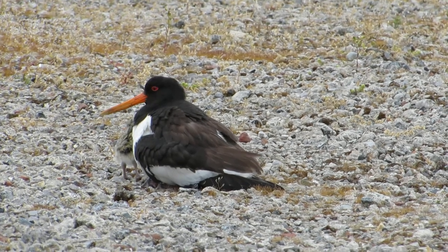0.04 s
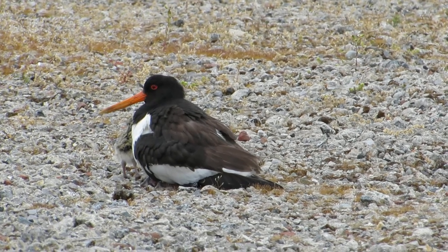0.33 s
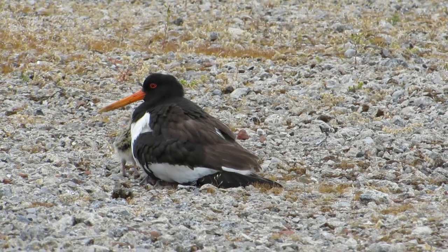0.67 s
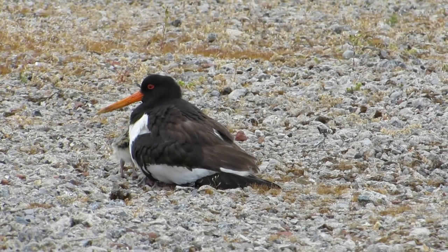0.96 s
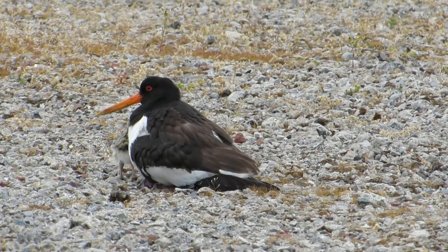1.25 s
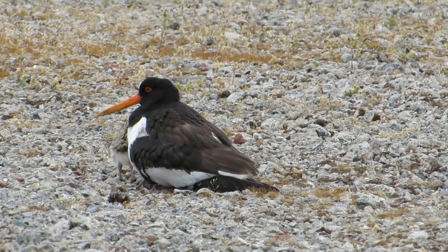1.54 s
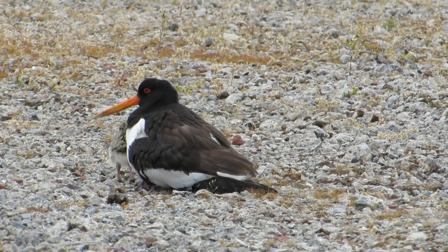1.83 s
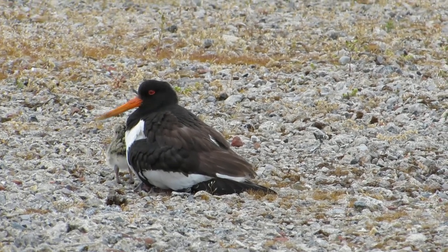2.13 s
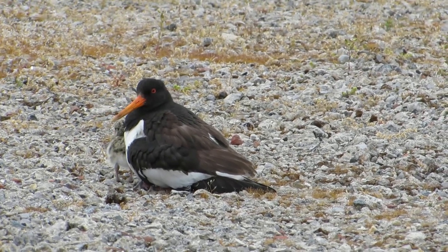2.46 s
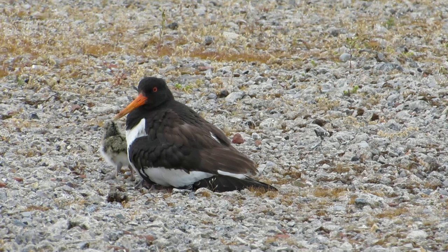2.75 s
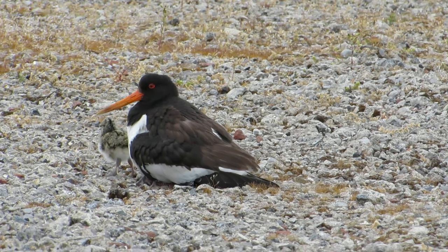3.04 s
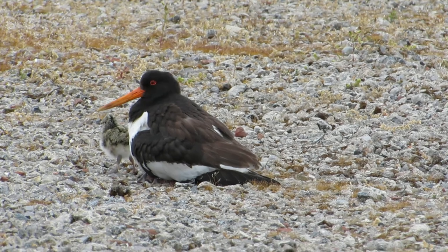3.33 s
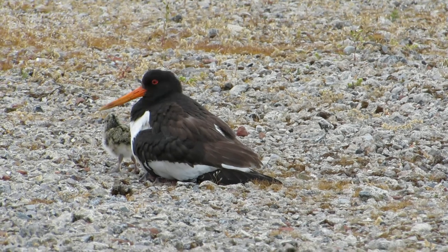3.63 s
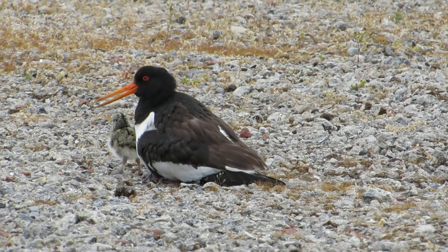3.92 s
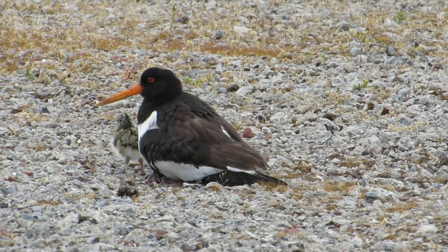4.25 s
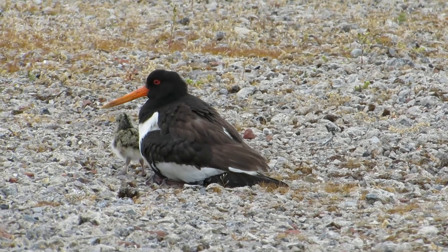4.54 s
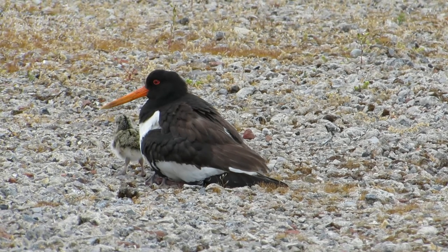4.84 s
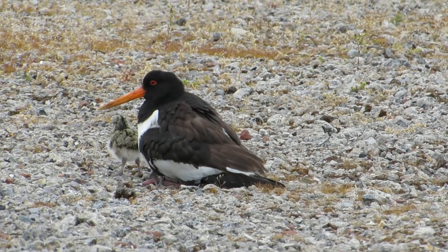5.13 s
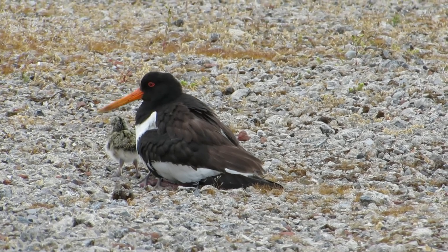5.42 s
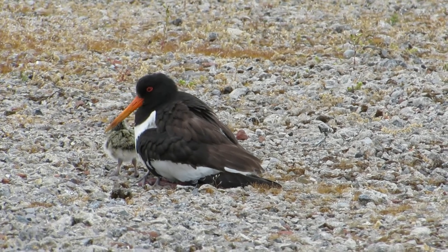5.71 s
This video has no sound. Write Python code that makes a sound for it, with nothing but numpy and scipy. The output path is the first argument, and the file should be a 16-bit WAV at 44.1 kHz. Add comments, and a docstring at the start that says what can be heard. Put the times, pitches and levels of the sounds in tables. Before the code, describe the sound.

Low gusts thump and rumble on the microphone outdoors on a stony shore, over a far roar like surf or traffic and a faint hiss. Light ticks and soft rubbing come close by between the early puffs. After one sharp, crackling gust, a shorebird pipes once, a brief whistle that jumps up and slides down. The buffeting dies away and the background grows slightly louder.

```python
"""Wind buffets the camera's microphone ports in puffs, over a distant roar and a faint hiss.
The hardest puffs crackle and push the gain control down. Small dry contacts tick and rustle close by.
Near 4 s an oystercatcher on a shingle bank gives one piping call that rises and sinks:
a few partials from the syrinx, shaped by throat and bill, echoed faintly by the shore."""
import sys
import numpy as np
from scipy import signal
from scipy.fft import rfft, irfft, next_fast_len
from scipy.io import wavfile
from scipy.ndimage import uniform_filter1d, minimum_filter1d, map_coordinates

SR = 44100
rng = np.random.default_rng(int(sys.argv[2]) if len(sys.argv) > 2 else 0)


def unload_wav(signal):
    """Save mono or channel-first audio to the path in sys.argv[1] as 16-bit WAV at rate SR, clipped to [-1, 1]."""
    wavfile.write(
        sys.argv[1],
        SR,
        np.round(np.clip(np.atleast_2d(signal).T, -1, 1) * 32767).astype(np.int16),
    )


N = 259308

# Slow rise and fall of the whole background, roar and hiss together: time_s, level_db
BACKGROUND_LEVEL = [(0, -51.5), (.7, -47), (1.15, -45.5), (2.3, -49), (3.15, -47), (4.7, -46),
                    (5.15, -44.5), (5.35, -42.5), (5.5, -43), (5.88, -40)]


def amp(db):
    """Decibels to gain."""
    return 10 ** (np.asarray(db) / 20)


def unit(x):
    """x at rms 1."""
    return x / np.sqrt(np.mean(x ** 2) + 1e-20)


def along(points, hz):
    """Interpolate (freq_hz, value) points on a log axis."""
    freq_hz, values = np.transpose(points)
    return np.interp(np.log(hz + 1), np.log(freq_hz + 1), values)


def curve(points):
    """Interpolate (time_s, value) points at every sample."""
    time_s, values = np.transpose(points)
    return np.interp(np.arange(N) / SR, time_s, values)


def wobble(rate_hz):
    """Smooth random curve, rate_hz knots a second."""
    knots = rng.standard_normal(int(N * rate_hz / SR) + 4)
    return map_coordinates(knots, [np.arange(N) * rate_hz / SR])


def filtered(x, response):
    """Apply the frequency response response(hz)."""
    n = x.shape[-1]
    padded = next_fast_len(n + 4096)
    return irfft(rfft(x, padded) * response(np.fft.rfftfreq(padded, 1 / SR)), padded)[..., :n]


def add(track, start_s, sound):
    """Mix a short sound into the track."""
    start = max(round(start_s * SR), 0)
    track[start:start + len(sound)] += sound[:N - start]


def wind(wake_db=-20, wake_s=0.046, ref_length_s=0.0073, lumps_db=6.0, lean_db=24.5,
         cross_db=-3.0, cross_hz=1700):
    """Turbulence on two close ports; each port's bass also reaches the other channel, inverted."""
    # Breeze on the ports: time_s, level_db
    breeze = [(0, -27.5), (.3, -44), (.75, -23), (1.05, -32), (1.3, -21), (2, -19), (2.3, -31.5),
              (2.75, -20.5), (3.72, -49), (3.92, -20), (4.55, -26), (4.85, -51), (5.5, -65), (5.85, -40.5)]
    # Buffeting spectrum: freq_hz, density_db
    buffet = [(20, 1), (45, 0), (90, 0), (150, -8.5), (250, -21), (500, -35), (1500, -109)]
    # Strong puffs: time_s, level_db, half_length_s, cutoff_hz, side (+ left, - right)
    puffs = [(0.096, -5, 0.01, 210, 0.089), (0.158, -15.5, 0.0048, 256, 1),
             (0.635, -3.5, 0.0085, 258, -.35), (1.178, -2.5, 0.011, 186, 0.43),
             (1.198, 1.5, 0.0063, 237, 0.54), (1.215, 0, 0.0093, 140, 0.47),
             (1.238, -2.5, 0.0034, 440, 0.83), (1.27, -10, .008, 130, 0.9), (1.322, 0, .006, 149, 0.46),
             (1.34, -2.5, 0.0096, 215, 1), (1.474, 0, 0.0068, 268, .02), (1.507, 1, 0.0054, 247, 1),
             (1.524, 7.5, .0052, 297, 0.68), (1.555, 3.5, 0.0088, 262, 0.73), (1.569, 1, 0.0083, 260, 0.4),
             (1.714, -6.5, 0.016, 220, -0.78), (1.813, -4.5, 0.021, 190, 0.16),
             (1.962, -14.5, 0.025, 125, -1.4), (2.139, 0.5, 0.0053, 170, 0.64),
             (2.146, -2.5, 0.0035, 305, 0.96), (2.844, -8.5, 0.0097, 223, -0.82),
             (3.31, -6, .004, 205, 0.63), (3.321, -0.5, 0.0027, 297, 0.49), (3.331, 1, 0.0064, 260, 0.96),
             (3.368, -11, .008, 228, .5), (3.395, -1.5, .007, 220, 0.88), (3.412, -5.5, 0.0083, 190, .5),
             (3.428, 8.5, 0.0019, 500, .68), (3.433, 6, 0.0041, 190, -0.025),
             (3.464, -4, .0031, 330, -0.99), (3.521, -6.5, .0042, 310, -1.2),
             (3.952, -10.5, 0.015, 150, -1.06)]
    t = np.arange(N) / SR
    # Buffeting surrounds each puff, more for long ones.
    wakes = sum(amp(db + wake_db) * np.sqrt(length_s / ref_length_s) * np.exp(-np.abs(t - s) / wake_s)
                for s, db, length_s, _, _ in puffs)
    breeze_db = 20 * np.log10(amp(curve(breeze)) + wakes)
    side = curve([(s, port) for s, _, _, _, port in puffs])  # the breeze leans with the puffs
    flow = filtered(rng.standard_normal((2, N)), lambda hz: amp(along(buffet, hz)))
    lumps = amp(lumps_db * np.array([wobble(23.77), wobble(17)]) + lean_db * np.array([side, -side]) / 2)
    buffeting = amp(breeze_db) * unit(flow * lumps) / np.sqrt(2)
    ports = buffeting + eddies(puffs) + stray_eddies(breeze_db, side)
    return ports - amp(cross_db) * filtered(ports[::-1], lambda hz: 1 / (1 + 1j * hz / cross_hz))


def eddies(rows, highpass_hz=45, steepness=4.08):
    """Each eddy is one compact, randomly shaped lump of pressure on one port."""
    ports = np.zeros((2, N))
    t = np.arange(-SR // 16, SR // 16) / SR
    for time_s, level_db, half_length_s, cutoff_hz, side in rows:
        swirl = rfft(rng.standard_normal(len(t)) * np.exp(-(t / half_length_s) ** 2))
        lump = irfft(swirl / np.abs(swirl), len(t)) * np.exp(-(t / (2 * half_length_s)) ** 2)
        eddy = filtered(lump, lambda f: f / (highpass_hz + 1j * f) / (1 + (f / cutoff_hz) ** steepness))
        add(ports[int(side < 0)], time_s + t[0], amp(level_db) * eddy / np.abs(eddy).max())
    return ports


def stray_eddies(breeze_db, side, count=40, offset_db=-1, scatter_db=2.5,
                 half_length_s=0.017, cutoff_hz=159):
    """Small eddies at random moments, about as strong as the breeze that carries them."""
    moments = rng.integers(N, size=count)
    peaks_db = breeze_db[moments] + offset_db + scatter_db * rng.standard_normal(count)
    return eddies([(i / SR, db, half_length_s, cutoff_hz, side[i]) for i, db in zip(moments, peaks_db)])


def diffuse_noise(spectrum):
    """Noise from all around at rms 1: channels alike in the bass, unrelated in the treble."""
    # Left-right likeness: freq_hz, correlation
    likeness = [(60, 0.88), (130, 1), (290, 0.56), (630, 0.81), (1380, 0.68), (3010, 0.39), (6590, 0.007),
                (14400, 0.037)]

    def mid_side(hz):
        angle = np.arccos(np.clip(along(likeness, hz), -1, 1)) / 2
        return amp(along(spectrum, hz)) * [np.cos(angle), np.sin(angle)]

    mid, side = filtered(rng.standard_normal((2, N)), mid_side)
    return unit(np.array([mid + side, mid - side]))


def distant_roar(rumble_db=-41, rumble_follow=0.67, rumble_waver_db=1.0, rush_waver_db=0.3, lean_db=0.32):
    """Far traffic or surf: a low rumble under a broad rush, both following the background level."""
    # Rumble spectrum: freq_hz, density_db
    rumble_spectrum = [(13, -76), (22, -5.5), (36, -0.5), (59, 0), (128, -5), (161, -6), (204, -11),
                       (380, -17.5), (490, -24.5), (840, -120)]
    # Rush spectrum: freq_hz, density_db
    rush_spectrum = [(280, -11), (480, -6), (523, -1), (707, 0.5), (929, -6.5), (1350, -10.5),
                     (1600, -14.5), (1830, -14), (2690, -23), (3590, -26.5), (3960, -31.5), (7460, -32.5),
                     (8130, -36), (12700, -40), (14900, -54)]
    rush_db = curve(BACKGROUND_LEVEL)
    drift_db = rumble_follow * (rush_db - rush_db.mean())
    rumble = amp(rumble_db + drift_db + rumble_waver_db * wobble(6.2)) * diffuse_noise(rumble_spectrum)
    rush = amp(rush_db + rush_waver_db * wobble(7.0)) * diffuse_noise(rush_spectrum)
    return rumble + rush * amp([[lean_db], [-lean_db]])


def thin_hiss(centre_hz=7580, width_hz=90, mean_db=-83):
    """Faint narrow band of hiss that rises and falls with the whole background."""
    background_db = curve(BACKGROUND_LEVEL)
    band = filtered(rng.standard_normal(N), lambda hz: np.exp(-((hz - centre_hz) / width_hz) ** 2))
    return amp(mean_db + background_db - background_db.mean()) * unit(band)


def tick_colour(hz, gap_hz=4000, gap_width_hz=480):
    """Ticks and rustles ring near 2.8 and 5.6 kHz, with little between."""
    # Short resonances: centre_hz, width_hz, gain_db
    modes = [(1820, 260, 0), (2790, 610, 4), (5600, 1460, -0.5), (10000, 5500, -22)]
    response = sum(amp(db) * (1j * hz * width / (centre ** 2 - hz ** 2 + 1j * hz * width)) ** 2
                   for centre, width, db in modes)
    return response * (1 - np.exp(-((hz - gap_hz) / gap_width_hz) ** 2))


def ticks():
    """Small hard contacts: noise bursts in a few short resonances, each in its own band."""
    # Contacts: start_s, peak_db, centre_hz, spread_octaves, t60_s
    contacts = [(.493, -44.5, 2870, 0.17, .021), (.533, -56.5, 6200, .42, 0.029),
                (.599, -39.5, 2600, 0.97, .028), (0.625, -47, 4440, 1.1, .056),
                (1.078, -46, 2200, 0.55, .021), (1.2729, -27, 3870, 1.2, 0.011),
                (1.282, -40, 3100, 0.86, 0.025), (1.343, -53, 8060, 1, 0.005),
                (1.351, -50.5, 3200, 0.27, .04), (1.359, -55, 7000, .9, .01)]
    track = np.zeros(N)
    t = np.arange(SR // 8) / SR
    for start_s, peak_db, centre_hz, spread_octaves, t60_s in contacts:
        burst = rng.standard_normal(len(t)) * amp(-60 * t / t60_s)
        band = lambda hz: np.exp(-(np.log2((hz + 1) / centre_hz) / spread_octaves) ** 2)
        tick = filtered(burst, lambda hz: tick_colour(hz) * band(hz))
        add(track, start_s, amp(peak_db) * tick / np.abs(tick).max())
    return track


def overload_cracks(half_length_s=0.00063, cutoff_hz=2800, antiphase=0.35):
    """The microphone snaps at the crest of the hardest puffs, partly in antiphase between channels."""
    # Snaps: time_s, peak_db
    snaps = [(1.198, -34.5), (1.52, -30), (1.5224, -29.5), (3.427, -24)]
    track = np.zeros((2, N))
    t = np.arange(-SR // 200, SR // 200) / SR
    for time_s, peak_db in snaps:
        noise = rng.standard_normal((2, len(t)))
        burst = (noise - antiphase * noise[::-1]) * np.exp(-(t / half_length_s) ** 2)
        snap = filtered(burst, lambda hz: 1 / (1 + 1j * hz / cutoff_hz))
        for channel, sound in zip(track, snap):
            add(channel, time_s + t[0], amp(peak_db) * sound / np.abs(sound).max())
    return track


def rustles(grain_db=3, highpass_hz=2100):
    """Light rubbing close by: grainy noise in the same resonances as the ticks."""
    # Strokes: centre_s, level_db, half_length_s
    strokes = [(1.96, -66, 0.11), (2.145, -73, 0.023), (2.726, -74, .11), (3.1, -71, 0.29),
               (4.32, -64, .02)]
    t = np.arange(N) / SR
    envelope = sum(amp(db) * np.exp(-((t - s) / half_length_s) ** 2) for s, db, half_length_s in strokes)
    friction = rng.standard_normal((2, N)) * amp(grain_db * wobble(70))
    rubbing = filtered(friction, lambda hz: tick_colour(hz) / (1 + (highpass_hz / (hz + 1)) ** 8))
    return envelope * unit(rubbing)


def oystercatcher(attack_s=0.0036, release_s=0.038, fade_db=15, settle_s=0.0078, gain_db=0.2, rasp_db=-57,
                  jitter=0.008, shimmer_db=0.5, flutter_db=0.5, mellowing=0.43, rolloff_partial=5.33):
    """A whistle with a rasping start; partials flare as they slide through throat and bill resonances."""
    # Quick rise, long sag: time_s, pitch_hz
    contour = [(3.952, 2230), (3.962, 2346), (3.988, 2743), (4.004, 2734), (4.02, 2700), (4.032, 2582),
               (4.051, 2537), (4.114, 2430), (4.175, 2093), (4.193, 1840)]
    # Response of throat and open bill: freq_hz, gain_db
    throat = [(2500, -48.5), (2760, -43.5), (4150, -48.5), (4850, -41), (5150, -38.5), (5480, -54.5),
              (6950, -87), (7400, -48.5), (7700, -47.5), (8150, -67), (9700, -54.5), (10200, -58.5),
              (11000, -55.5), (12300, -61), (12900, -50), (13750, -58.5), (14500, -67)]
    # Stereo balance of the partials: freq_hz, left_minus_right_db
    balance = [(2400, -3.5), (2760, -2.5), (4400, 0), (5150, 5), (5480, -15), (7600, -2), (8200, 18),
               (9000, -4), (11000, -3), (12700, -7)]
    # Rasp spectrum: freq_hz, density_db
    rasp_spectrum = [(2000, -30), (5000, -6), (10000, 2), (14000, -7), (15000, -20)]
    start_s, end_s = contour[0][0], contour[-1][0]
    t = np.arange(N) / SR
    on = (t > start_s) & (t < end_s)
    age_s = np.maximum(t - start_s, 0)
    attack = on * np.minimum(age_s / attack_s, 1)
    effort_db = -fade_db * np.clip(1 - (end_s - t) / release_s, 0, 1) ** 2
    roughness = 0.24 + 1.3 * np.exp(-age_s / settle_s)  # starts harsh, then clears
    pitch_hz = (curve(contour) * (1 + jitter * roughness * wobble(1500)))[on]
    strength = (attack * amp(gain_db + shimmer_db * roughness * wobble(900)))[on]
    phase = 2 * np.pi * np.cumsum(pitch_hz) / SR
    voice = np.zeros((2, N))
    for k in range(1, 7):
        syrinx = np.sqrt(2) * np.sin(k * phase) / (1 + (k / rolloff_partial) ** 16)
        partial_db = along(throat, k * pitch_hz)
        partial_db += effort_db[on] * (1 + mellowing * (k - 1))  # high partials fade first
        partial_db += flutter_db * k * wobble(420)[on]
        lean_db = along(balance, k * pitch_hz) / 2
        voice[:, on] += strength * amp(partial_db + np.array([lean_db, -lean_db])) * syrinx
    air = unit(filtered(rng.standard_normal(N), lambda hz: amp(along(rasp_spectrum, hz))))
    return voice + attack * roughness ** 2 * amp(rasp_db + effort_db) * air


def ground_scatter(x, delay_s=0.017, cutoff_hz=3000):
    """The open ground scatters back a dull tail."""
    # Decay of the tail: freq_hz, t60_s
    decay = [(500, .5), (2400, 0.38), (5000, 1), (12000, .1)]
    hz, t, spectra = signal.stft(rng.standard_normal((2, SR // 2)), SR, nperseg=256)
    _, tail = signal.istft(spectra * amp(-60 * t / along(decay, hz)[:, None]), SR, nperseg=256)
    wet = signal.fftconvolve(x, tail / np.linalg.norm(tail[0]), axes=1)[:, :N]
    return filtered(wet, lambda f: np.exp(-2j * np.pi * f * delay_s) / (1 + (f / cutoff_hz) ** 4))


def bank_echo(x, delay_s=0.093, cutoff_hz=2850):
    """One dull reflection from further along the shore, left and right swapped."""
    return filtered(x[::-1], lambda f: np.exp(-2j * np.pi * f * delay_s) / (1 + (f / cutoff_hz) ** 6))


def gain_control(x, hold_s=0.092, release_s=0.28):
    """A peak over full scale turns the gain down just in time; it holds, then creeps back."""
    over_db = np.maximum(20 * np.log10(np.abs(x).max(axis=0) + 1e-9), 0)
    fade = np.exp(-np.arange(N) / SR / release_s)
    gain_db = -np.maximum.accumulate(over_db / fade) * fade
    half_hold = int(hold_s * SR / 2)
    held_db = minimum_filter1d(gain_db, size=2 * half_hold + 1, origin=half_hold)
    smooth_db = uniform_filter1d(minimum_filter1d(held_db, size=41), size=41)
    return x * amp(smooth_db)


def scene():
    """Stereo mix of bird, close contacts, wind and background."""
    call = oystercatcher()
    bird = call + amp(-12.0) * ground_scatter(call) + amp(-13.5) * bank_echo(call)
    return bird + ticks() + rustles() + wind() + overload_cracks() + distant_roar() + thin_hiss()


def record(dry):
    """The camera rides its gain and cuts everything above its band limit."""
    limit_hz = 15100
    return filtered(gain_control(dry), lambda hz: hz < limit_hz)


dry = scene()
out = record(dry)
unload_wav(out)
```